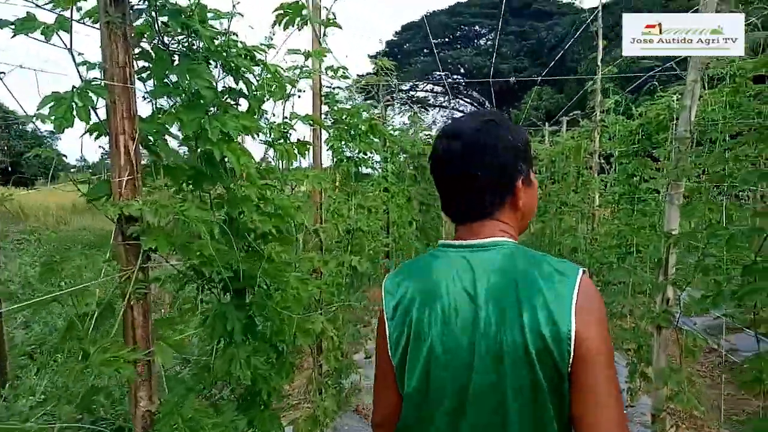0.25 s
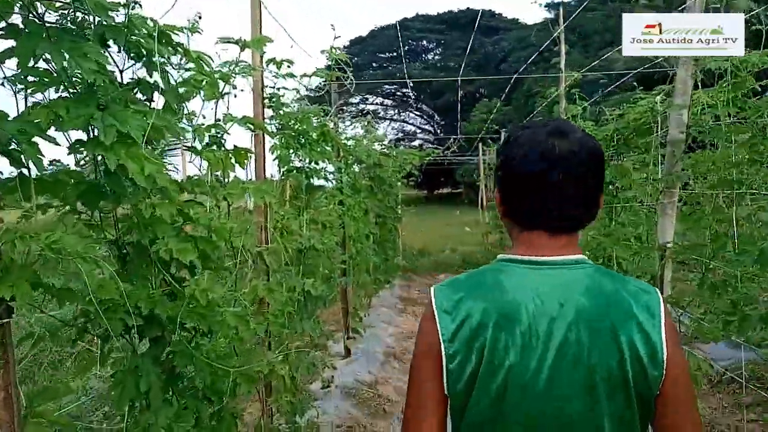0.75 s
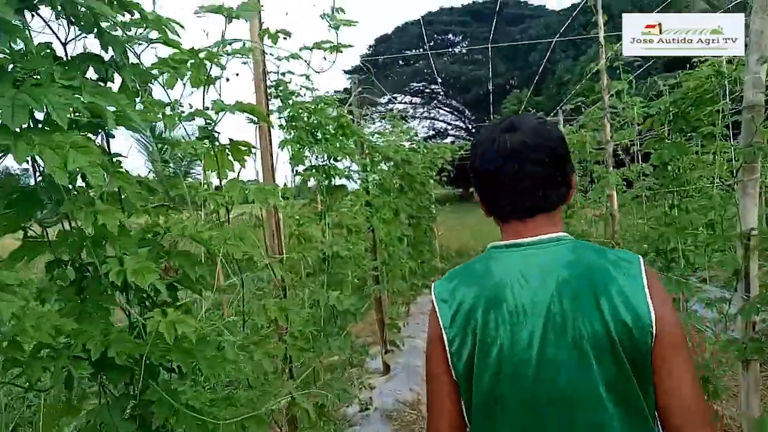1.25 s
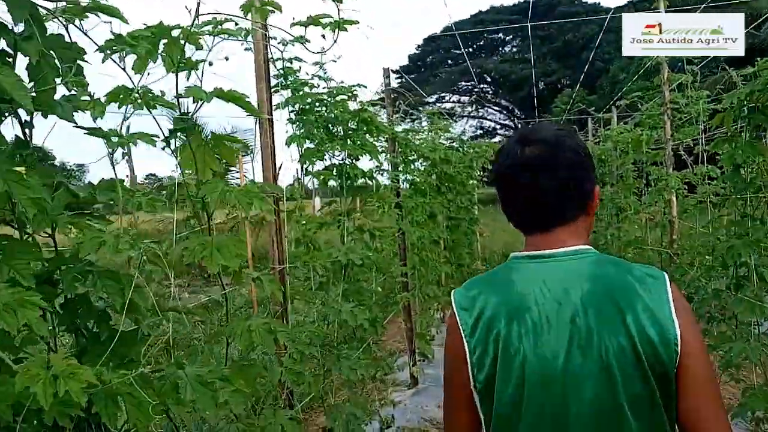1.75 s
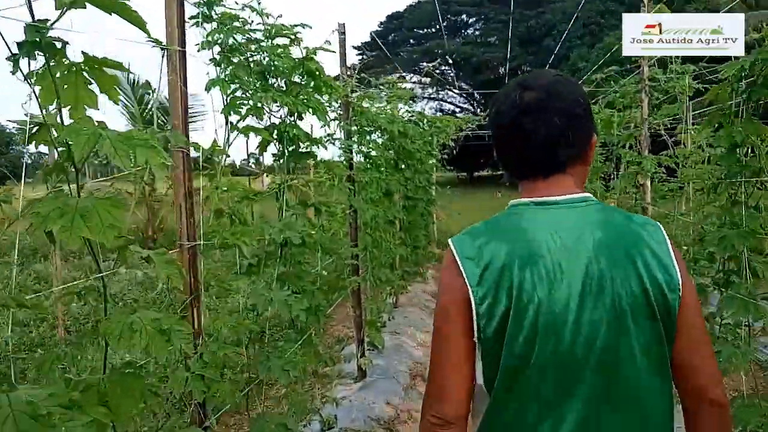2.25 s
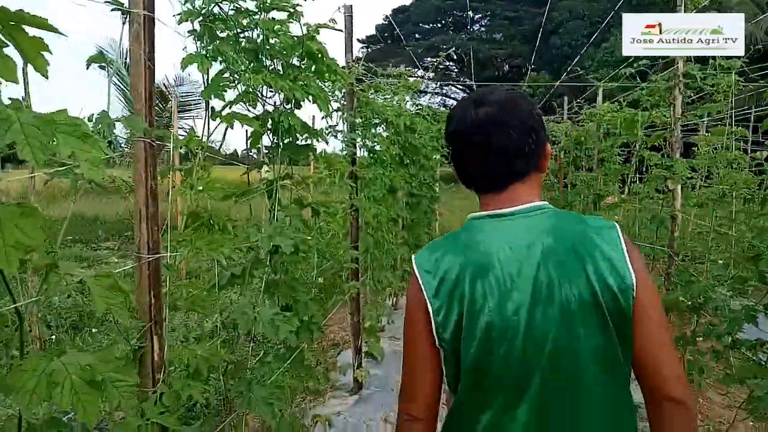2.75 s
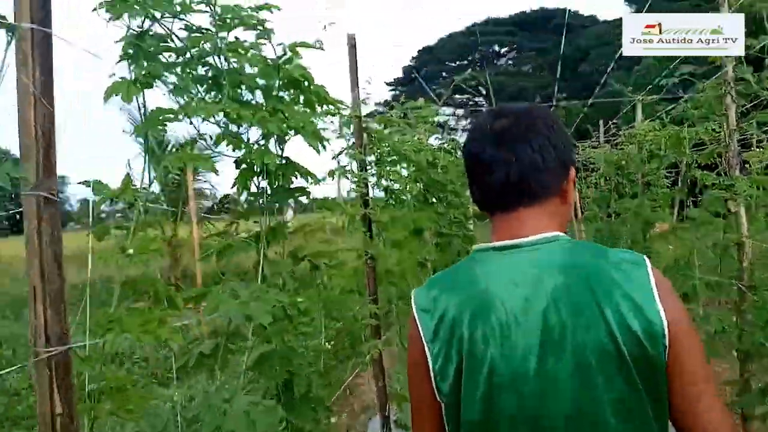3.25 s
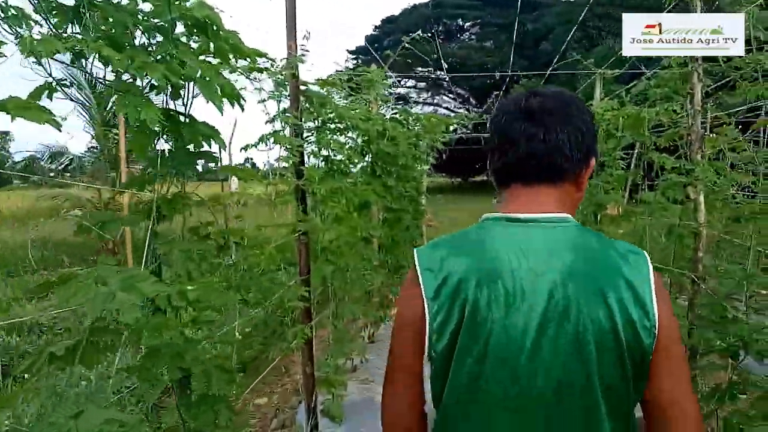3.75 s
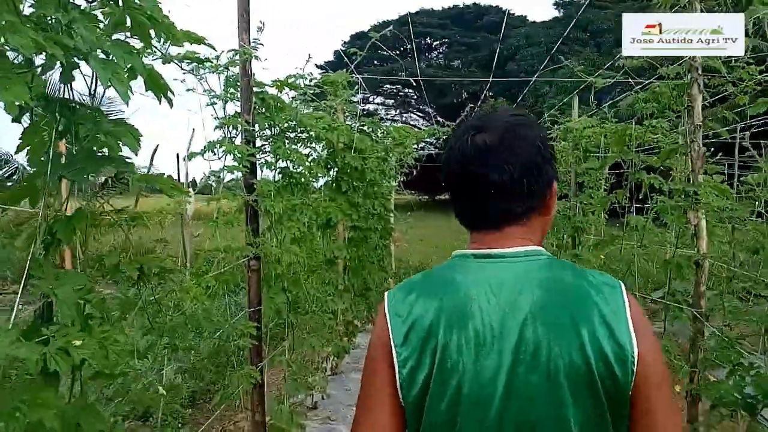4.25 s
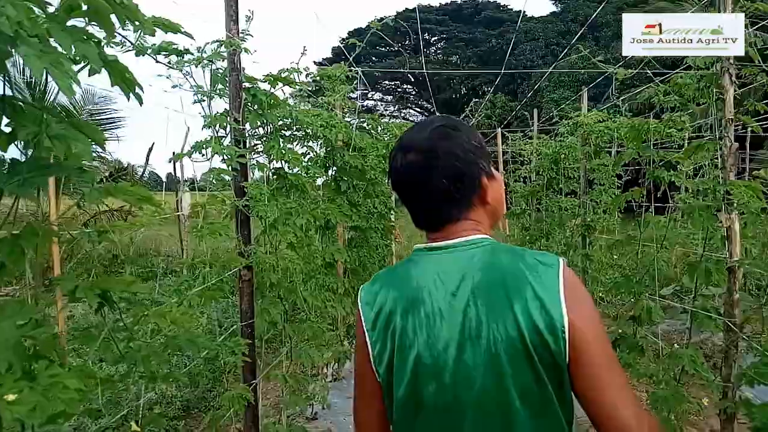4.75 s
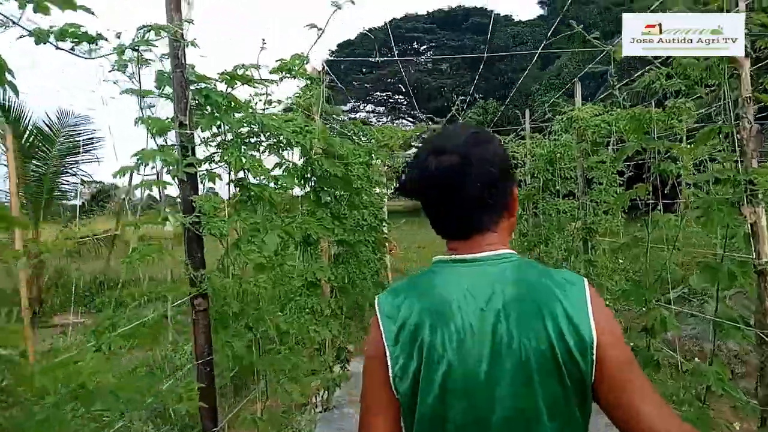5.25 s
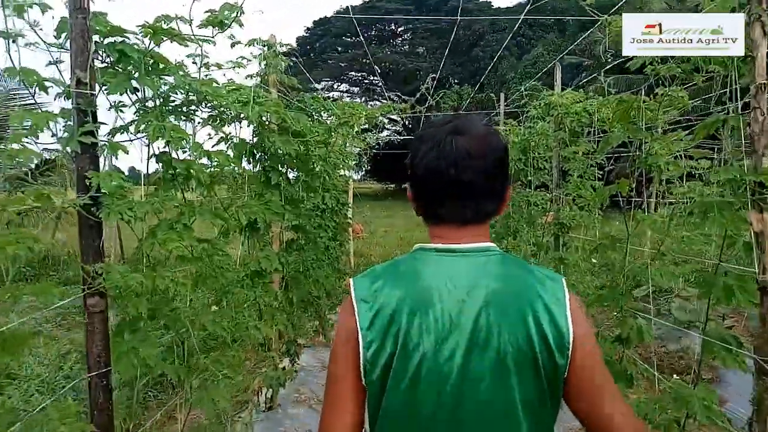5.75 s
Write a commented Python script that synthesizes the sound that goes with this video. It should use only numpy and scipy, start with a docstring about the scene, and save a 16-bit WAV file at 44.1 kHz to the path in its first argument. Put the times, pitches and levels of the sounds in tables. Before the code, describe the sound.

A goat bleats twice in wavering cries while someone brushes through leafy vines, with distant roosters, insects and a low engine rumble.

```python
"""Goat among the trellises

A goat bleats twice, in wavering swells: vocal-fold harmonics pass through throat resonances, with rasp.
Someone walks between vegetable trellises: shaped noise for brushing leaves and dry stalks underfoot.
Roosters crow far off and small birds call, as gliding tones smeared by scattering.
Insects shrill as noise through narrow resonances; a distant engine rumbles as low noise and tones."""
import sys
import numpy as np
from scipy import signal
from scipy.fft import rfft, irfft, next_fast_len
from scipy.io import wavfile

SR = 44100
rng = np.random.default_rng(int(sys.argv[2]) if len(sys.argv) > 2 else 0)


def dump_mix(stems):
    """Bounce the given channels to the path in sys.argv[1] as a 16-bit WAV at rate SR."""
    frames = np.atleast_2d(stems).T  # one column per channel
    limited = np.clip(frames, -1, 1)  # hard clip at full scale
    pcm = np.round(limited * 32767).astype(np.int16)
    wavfile.write(sys.argv[1], SR, pcm)


N = 264159
T = np.arange(N) / SR   # time in s


# throat resonances in each bleat: f/Hz, relative level/dB
FIRST_THROAT = [(480, -2), (960, 3.5), (1440, 1), (1920, -3.5), (2400, -16.5), (2880, -23), (3370, -3),
                (3850, -12), (4330, -5), (4850, -7.5), (5300, -6), (5780, -21), (6550, -3), (8200, -55)]
SECOND_THROAT = [(360, 4), (470, -5), (750, -17), (930, 14), (1380, -4.5), (1850, -14), (2320, -21.5),
                 (2790, 0), (3230, 4), (3720, -4), (4200, 5.5), (4650, 1.5), (5200, -13), (7500, -36)]
# harmonics under the chest, mouth, nasal and upper resonances: first number, last number
VOICE_GROUPS = [(1, 2), (3, 5), (6, 8), (9, 17)]
# colour of the breathy rasp: f/Hz, relative density/dB per Hz
RASP = [(300, -11), (600, 1.5), (1400, -9), (2400, -9), (3300, -4), (5000, -1.5), (7000, -1), (12000, -15)]
# the folds lose their grip as a bleat starts or ends: t/s, half length/s, extra jitter (share of the pitch)
BREAKS = [(0.258, 0.016, .045), (1.828, 0.023, 0.06), (2.388, 0.029, 0)]
# jaw and tongue move two resonances: t/s, mouth f/Hz, nasal f/Hz
TONGUE = [(0, 1670, 3520), (.1, 1510, 3380), (.19, 1730, 3350), (.26, 1450, 3300), (1.9, 1600, 3140),
          (1.99, 1910, 3207), (2.06, 1330, 3230), (2.13, 1600, 3050), (2.2, 1450, 3020),
          (2.255, 1335, 2540), (2.31, 1740, 2970), (2.38, 1303, 2670)]
TONGUE_LIFT_DB, TONGUE_WIDTH_HZ = 6, 310
THROAT_SMEAR = .45   # the ringing throat spreads each puff over its cycle: rad per squared harmonic number


def bleat(pitch, levels, gate, throat, jitter, flutter_db, rasp_db, rasp_throb):
    """Source and filter: fold harmonics weighted by the throat, with rasp puffed out once a cycle."""
    on = gate > 0
    unsteady = jitter + sum(extra * swell(s, half) for s, half, extra in BREAKS)
    phase = turning(pitch * (1 + unsteady * drift(116)))
    centres = [hz[on] for hz in in_time(TONGUE)]
    voice = np.zeros(N)
    for (first, last), level_db in zip(VOICE_GROUPS, levels):
        orders = np.arange(first, last + 1)[:, None]
        hz = orders * pitch[on]
        nearness = sum(np.exp(-((hz - centre) / TONGUE_WIDTH_HZ) ** 2) for centre in centres)
        flutter = np.array([drift(29)[on] for _ in orders])
        gains = from_db(at_hz(throat, hz) + TONGUE_LIFT_DB * nearness + flutter_db * flutter)
        # the harmonics under one resonance share its power
        gains = gains / np.sqrt((gains ** 2).sum(axis=0) / 2)
        harmonics = gains * np.sin(orders * phase[on] - THROAT_SMEAR * orders ** 2)
        voice[on] += from_db(level_db[on]) * harmonics.sum(axis=0)
    effort = sum(from_db(level_db) for level_db in levels) / 2
    puffs = 1 + np.clip(rasp_throb, 0, 1) * np.cos(phase)
    rasp = from_db(rasp_db) * effort * noise(RASP) * puffs
    return gate * (voice + rasp)


# quavers, in which the mouth opens and the pitch sags:
# t/s, half length/s, chest level/dB, mouth level/dB, sag f/Hz
QUAVERS = [(0.002, 0.025, -54, -34.5, 1), (.087, .013, -46, -19.5, 9), (0.185, .014, -40.5, -26.5, 8.5),
           (0.245, .012, -63, -42, 1), (1.909, .015, -62, -40, 19), (1.975, .011, -39, -24, 21),
           (2.06, .019, -37.5, -23, 23), (2.15, .022, -33, -31.5, 0), (2.197, 0.0145, -35.5, -31.5, 8.5),
           (2.26, 0.026, -28.5, -37.5, 1.5), (2.316, .023, -45, -23, 3), (2.362, 0.0087, -46, -27.5, 0.5),
           (2.377, 0.0057, -31, -31, 12)]
SAG_LINGERS = 1.2   # the sag outlasts its quaver by this factor
FALL_SHARE, FALL_S = 0.27, .028   # the pitch collapses as a bleat runs out
GRUFF_S, GRUFF_DROP = .065, .235   # lower register at the start: length, share of the pitch


def bleat_pitch(start, end, held_hz):
    """Fold tension sets pitch: it cracks up from a gruff start, sags in quavers and collapses at the end."""
    sag = sum(sag_hz * swell(s, half * SAG_LINGERS) for s, half, _, _, sag_hz in QUAVERS)
    fall = FALL_SHARE * np.exp(np.minimum(T - end, 0) / FALL_S)
    register = 1 - GRUFF_DROP * (T < start + GRUFF_S)
    return (held_hz - sag) * (1 - fall) * register


CLOSED_CHEST_DB, CLOSED_MOUTH_DB = -55, -52   # between quavers


def bleat_levels(nasal, buzz, nasal_db, buzz_db):
    """Modulation by the mouth: of the chest, mouth, nasal and upper levels, quavers swell the lower two."""
    chest, mouth = sum(from_db(levels_db)[:, None] * swell(s, half) for s, half, *levels_db, _ in QUAVERS)
    chest_db = 20 * np.log10(chest + from_db(CLOSED_CHEST_DB))
    mouth_db = 20 * np.log10(mouth + from_db(CLOSED_MOUTH_DB))
    return [chest_db, mouth_db, in_time(nasal)[0] + nasal_db, in_time(buzz)[0] + buzz_db]


# nasal ring and upper buzz, one curve per bleat: t/s, level/dB before the bleat's offset
NASAL = [
    [(0.0, -29), (0.03, -32), (0.1, -22.5), (0.12, -37), (0.14, -39.5), (0.202, -30), (0.262, -56)],
    [(1.8, -65), (1.866, -58), (1.894, -35), (2.07, -26.5), (2.176, -27.5), (2.19, -39), (2.292, -28),
     (2.368, -45), (2.395, -55)],
]
BUZZ = [
    [(0.0, -33), (0.042, -39), (0.086, -30.5), (0.112, -27.5), (0.138, -39), (0.18, -34.5), (0.252, -39.5),
     (0.262, -48)],
    [(1.8, -49), (1.884, -51), (2.068, -38), (2.102, -39.5), (2.182, -31), (2.214, -38.5), (2.274, -24.5),
     (2.374, -42), (2.395, -58)],
]


def goat():
    """Two source-filter bleats with their echoes; the first is already under way."""
    first = bleat(
        bleat_pitch(start=-.2, end=.277, held_hz=486.5),
        bleat_levels(NASAL[0], BUZZ[0], nasal_db=-0.5, buzz_db=-1.0),
        during(NASAL[0]), FIRST_THROAT, jitter=0.0087, flutter_db=5.5, rasp_db=-20.5, rasp_throb=1.0)
    second = bleat(
        bleat_pitch(start=1.8, end=2.394, held_hz=470.4),
        bleat_levels(NASAL[1], BUZZ[1], nasal_db=0, buzz_db=-1.0),
        during(NASAL[1]), SECOND_THROAT, jitter=0.0052, flutter_db=4.0, rasp_db=-15.5, rasp_throb=1.0)
    return outdoors(first + second, dull_hz=3000)


# echoes from the ground and the tree line: delay t/s, level/dB
ECHOES = [(.021, -22), (.05, -20), (0.092, -34), (.14, -40)]


def outdoors(x, dull_hz):
    """Diffuse reflection: each echo comes back dulled and smeared by leaves."""
    out = x.copy()
    for delay, db in ECHOES:
        smear = rng.standard_normal(int(.03 * SR)) * np.hanning(int(.03 * SR))
        back = signal.fftconvolve(x, smear / np.linalg.norm(smear))[:N]
        back = signal.sosfilt(signal.butter(1, dull_hz, fs=SR, output="sos"), back)
        out += from_db(db) * np.interp(T - delay, T, back, left=0)
    return out


# footfalls on dry stalks: t/s, half length/s before shaping, thud level/dB, crunch level/dB
STEPS = [(.926, 0.0075, -69, -43.5), (1.089, 0.0046, -40, -39), (1.11, .009, -44, -45),
         (1.156, .012, -44.5, -39), (1.194, 0.0013, -53, -41), (1.21, 0.031, -66, -45.5),
         (1.538, 0.01, -52, -47), (2.164, .0035, -34, -35), (2.922, 0.013, -44, -36.5),
         (2.972, 0.0078, -44, -29.5), (3.006, 0.017, -55, -46), (3.559, 0.015, -55, -47),
         (3.733, 0.04, -52, -40), (5.003, 0.011, -63, -38.5), (5.048, 0.01, -65, -38),
         (5.621, 0.0031, -66, -38), (5.677, .02, -46, -28), (5.926, 0.0054, -65, -47)]
# leaves and tendrils flicking past: t/s, half length/s before shaping, crackle level/dB
FLICKS = [(0.462, .015, -33.5), (1.356, 0.0042, -35), (1.404, .005, -40), (1.44, 0.0057, -28.5),
          (1.46, .004, -28), (1.569, 0.01, -30.5), (2.597, 0.0033, -38), (3.679, .011, -28.5),
          (5.497, .0047, -32.5), (5.524, 0.017, -31)]
# vines brushing past: peak t/s, rise/s, decay/s, level/dB before the brush gain
BRUSHES = [(.1, .04, 0.42, -46), (.445, 0.017, 0.5, -39.5), (1.38, 0.082, 0.54, -46.5),
           (2.04, 0.11, 0.14, -34), (2.28, 0.036, 0.071, -33.5), (3.2, .02, 0.26, -50),
           (3.75, 0.11, 0.22, -39), (5.02, .025, 0.21, -49), (5.5, 0.08, 0.22, -38),
           (5.86, 0.023, 0.23, -48)]
# noise colours of treading, stalks, fibres and leaves: f/Hz, relative density/dB per Hz
THUD = [(150, -34), (420, -3), (620, 2), (1050, 7.5), (1500, -9), (3000, -9)]
CRUNCH = [(200, 2.5), (450, -24.5), (750, -17), (1200, -2.5), (2100, 3.5), (2700, -4.5), (3300, -0.5),
          (4500, -7), (6500, -4), (10000, -15)]
CRACKLE = [(2000, -50), (4000, -2), (6000, 6), (9000, 7), (13000, -2), (15500, 12.5)]
LEAVES = [(300, -9.5), (1200, -12), (2500, -7.5), (5000, -10), (7000, -3), (9500, -8), (13000, -2),
          (14300, -6), (15500, 5.5)]
STEP_CRACKLE_DB = -9   # relative to the crunch
FLICK_THUD_DB, FLICK_CRUNCH_DB = -20.5, -14.5   # relative to the crackle


def walking(brush_db, leaf_grain_db, step_grain_db, attack, release):
    """Friction and fracture: leaves hiss sliding by; clumps of fibres break fast, then trail off."""
    sliding = 0
    for s, rise, decay, db in BRUSHES:
        shape = np.where(T < s, swell(s, rise), np.exp(-np.abs(T - s) / decay))
        sliding = sliding + from_db(db + brush_db) * shape
    brush = sliding * rms_one(noise(LEAVES) * from_db(leaf_grain_db * drift(320)))

    def breaking(rows):
        """Superposed bursts, one envelope for each level column."""
        return sum(from_db(levels_db)[:, None] * swell(s, half * np.where(T < s, attack, release))
                   for s, half, *levels_db in rows)

    tread, step = breaking(STEPS)
    flick, = breaking(FLICKS)
    thud = (tread + from_db(FLICK_THUD_DB) * flick) * noise(THUD)
    crunch = (step + from_db(FLICK_CRUNCH_DB) * flick) * noise(CRUNCH)
    crackle = (from_db(STEP_CRACKLE_DB) * step + flick) * noise(CRACKLE)
    grain = rms_one(from_db(step_grain_db * drift(490)))
    return brush + grain * (thud + crunch + crackle)


# held notes of far roosters: t/s, length/s, start f/Hz, middle f/Hz, end f/Hz, level/dB,
# fade/dB per s (negative grows), scattered share (capped at 1)
CROWS = [(0.391, 0.042, 1660, 1686, 1656, -58, 1, 0.84), (.55, .12, 1720, 1732, 1740, -54, 60, .9),
         (0.754, 0.55, 1800, 1806, 1787, -52.5, -5.5, 1.17),
         (1.61, 1.03, 1653, 1638, 1600, -49.5, 9.5, 0.16), (3.62, 0.094, 1920, 1920, 1930, -49, 10, 0.6),
         (3.813, 0.188, 1940, 1956, 1914, -38.5, 1, .3), (4.056, .16, 1938, 1925, 1910, -47.5, 20, .7),
         (4.384, .13, 1915, 1925, 1905, -52, 10, 0.86)]


def far_crows(rate):
    """Distance attenuation: only the strongest partial of a crow is left."""
    out = 0
    for s, length, start_hz, middle_hz, end_hz, level_db, fade, share in CROWS:
        hz = np.interp(T, [s, s + length / 2, s + length], [start_hz, middle_hz, end_hz])
        level = from_db(level_db - fade * np.clip(T - s, 0, length))
        out = out + level * held(s, length) * scattered(turning(hz), share, rate)
    return out


# syllables of the hoarse rooster: t/s, length/s, start f/Hz, end f/Hz,
# fundamental level/dB, throat level/dB, both before the voice's trims
SYLLABLES = [(3.387, 0.033, 714, 724, -46.5, -47), (3.623, 0.11, 840, 870, -51, -46),
             (3.85, 0.11, 815, 816, -43, -44.5), (3.978, .21, 810, 784, -42.5, -44.5),
             (4.457, 0.178, 830, 812, -52.5, -45.5), (4.661, 0.25, 794.5, 752, -58, -46.5),
             (4.972, 0.036, 668, 664, -45, -50)]
# colour of its rasp: f/Hz, relative density/dB per Hz
HOARSE_RASP = [(500, -25), (800, 2), (1000, -16), (1250, 1.5), (1550, 2), (1950, -0.5), (2300, -19),
               (3000, -12.5), (4000, -28)]


def hoarse_crow(low_db, high_db, rasp_db, throb_db):
    """Irregular vibration: two smeared harmonics in a throbbing rasp, the upper one rougher."""
    out, rasp = 0, from_db(rasp_db) * noise(HOARSE_RASP)
    for s, length, start_hz, end_hz, low, high in SYLLABLES:
        phase = turning(np.interp(T, [s, s + length], [start_hz, end_hz]))
        fundamental = from_db(low + low_db) * scattered(phase, share=1.0, rate=23.0)
        second = scattered(2 * phase, share=.8, rate=45)
        # the upper harmonic is weaker still where the throat level is below the fundamental
        second = second * min(from_db(high - low), 1)
        throat = from_db(high_db) * second + rasp
        throb = from_db(high + throb_db * drift(16))
        out = out + held(s, length) * (fundamental + throb * throat)
    return out


CROW_ATTACK_S, CROW_RELEASE_DB_PER_S = 0.04, 117


def held(s, length):
    """Exponential decay: a rooster's note attacks quickly, holds, then lingers over the field."""
    attack = np.clip(1 + (T - s) / CROW_ATTACK_S, 0, 1)
    return attack * from_db(-CROW_RELEASE_DB_PER_S * np.clip(T - s - length, 0, 1))


# short calls of birds and far fowl: t/s, length/s, start f/Hz, end f/Hz, level/dB, blur f/Hz
CHIRPS = [(0.908, 0.042, 2250, 2310, -44.5, 110), (1.292, 0.078, 6500, 5400, -47.5, 90),
          (1.31, 0.031, 2650, 2800, -52, 80), (2.675, 0.039, 440, 496, -51.5, 13),
          (3.014, 0.21, 1930, 2190, -58.5, 130), (3.357, 0.14, 1980, 1874, -46.5, 150),
          (3.383, 0.17, 1580, 1423, -46.5, 83), (3.59, .07, 2880, 2950, -48, 29),
          (3.614, 0.21, 1724, 1748, -44.5, 26), (3.805, 0.069, 6780, 5300, -39.5, 330),
          (3.83, 0.26, 2920, 2870, -53.5, 55), (4.006, 0.07, 4500, 4200, -49, 110),
          (4.302, .2, 1130, 1355, -54.5, 80), (5.068, 0.1, 1910, 1890, -48.5, 170),
          (5.736, 0.26, 2050, 2120, -48.5, 360)]


def bird():
    """Multipath scattering: short gliding calls, blurred by the foliage."""
    out = 0
    for s, length, start_hz, end_hz, level_db, blur_hz in CHIRPS:
        phase = turning(np.interp(T, [s, s + length], [start_hz, end_hz]))
        shape = swell(s + length / 2, length / 4)
        out = out + from_db(level_db) * shape * scattered(phase, share=0.95, rate=blur_hz)
    return out


# insect bands: f/Hz, width f/Hz, level/dB about which each flickers
INSECTS = [(3830, 1150, -55.5), (7802, 666, -43), (11076, 900, -46), (15000, 1200, -60)]
# one nearer insect swells: t/s, half length/s, level/dB
TRILLS = [(0.982, 0.12, -48), (1.483, 0.1, -44.5), (2.421, 0.058, -42), (3.257, 0.092, -39),
          (4.27, 0.082, -44.5), (5.148, 0.078, -40.5)]


def insects(trill_hz, trill_width_hz, undertone_db, flicker_db):
    """Resonance: a flickering chorus, and one insect that swells with a faint band an octave below."""
    chorus = sum(from_db(db + flicker_db * drift(45)) * shrill(hz, width) for hz, width, db in INSECTS)
    undertone = from_db(undertone_db) * shrill(trill_hz / 2, trill_width_hz)
    song = shrill(trill_hz, trill_width_hz) + undertone
    return chorus + song * sum(from_db(db) * swell(s, half) for s, half, db in TRILLS)


# colour of the engine's roar: f/Hz, relative density/dB per Hz
RUMBLE = [(13, -51), (22, -23), (32, -29), (34, -32), (40, -24), (50, -11.5), (81, -1.5), (129, 0.5),
          (146, -2.5), (162, -3.5), (194, -11), (230, -23.5), (249, -30.5), (330, -38.5), (430, -43),
          (730, -120)]
# brief low thumps in the rumble band: t/s, half length/s, level/dB
THUMPS = [(3.337, 0.032, -40), (3.73, 0.089, -46), (4.845, 0.026, -42), (5.924, .012, -30)]
# engine tones: f/Hz, level/dB before the common tone gain
ENGINE = [(65, -46), (93, -47), (142, -41.5)]
# upper drone under load: t/s, level/dB
ENGINE_LOAD = [(0, -68), (3.9, -66), (4.3, -47), (4.8, -44), (4.9, -44), (4.98, -74)]
RUMBLE_DB, RUMBLE_WANDER_DB = -34.5, 1.05


def rumble(tones_db, drone_hz, drone_width_hz):
    """Periodic and random radiation: a far engine's wandering tones, dull roar and drone under load."""
    thumps = sum(from_db(db) * swell(s, half) for s, half, db in THUMPS)
    roar = (thumps + from_db(RUMBLE_DB + RUMBLE_WANDER_DB * drift(5.7))) * noise(RUMBLE)
    tones = sum(from_db(db) * scattered(2 * np.pi * hz * T, share=0.39, rate=4.6) for hz, db in ENGINE)
    drone = from_db(in_time(ENGINE_LOAD)[0]) * shrill(drone_hz, drone_width_hz)
    return roar + from_db(tones_db) * tones + drone


# colour of the open air: f/Hz, relative density/dB per Hz
AIR = [(250, -1), (400, 3), (800, 1.5), (1700, 3), (2500, -1.5), (5500, -18), (15000, -5.5)]


def air(level_db):
    """Stationary noise: a faint steady hush."""
    return from_db(level_db) * noise(AIR)


def from_db(db):
    """Logarithmic level: decibels to amplitude gain."""
    return 10 ** (np.asarray(db) / 20)


def rms_one(x):
    """Root mean square: scale to unit level."""
    return x / np.sqrt(np.mean(np.abs(x) ** 2) + 1e-20)


def in_time(rows):
    """Linear interpolation: each column of a curve, sample by sample."""
    s, *columns = np.transpose(rows)
    return [np.interp(T, s, c) for c in columns]


def during(rows, fade=0.016):
    """Gating: one while a curve lasts, fading to zero outside it."""
    return np.clip(1 + np.minimum(T - rows[0][0], rows[-1][0] - T) / fade, 0, 1)


def at_hz(points, hz):
    """Logarithmic frequency: read a spectrum in dB between its points."""
    f, db = np.transpose(points)
    return np.interp(np.log(hz), np.log(f), db)


def noise(spectrum):
    """Spectral shaping: noise of a given colour at unit level."""
    size = next_fast_len(N, True)
    hz = np.fft.rfftfreq(size, 1 / SR) + 1e-3
    white = rfft(rng.standard_normal(size))
    return rms_one(irfft(white * from_db(at_hz(spectrum, hz)))[:N])


def drift(rate):
    """Low-passed chance: a random wander of unit spread, with rate in Hz."""
    r = np.exp(-40 * np.pi * rate / SR)   # computed at every 20th sample
    white = rng.standard_normal(N // 20 + 4002)
    slow = signal.lfilter([1], [1, -2 * r, r * r], white)[4000:]   # the filter has settled
    return np.interp(np.arange(N) / 20, np.arange(len(slow)), rms_one(slow))


def turning(hz):
    """Phase as the integral of frequency: a moving pitch to radians."""
    return 2 * np.pi * np.cumsum(hz) / SR


def scattered(phase, share, rate):
    """Multipath fading: a tone of which a share arrives over many shifting paths."""
    share = np.clip(share, 0, 1)
    smear = drift(rate) * np.cos(phase) + drift(rate) * np.sin(phase)
    return np.sqrt(2 * (1 - share)) * np.sin(phase) + np.sqrt(share) * smear


def shrill(hz, width_hz):
    """Cascaded resonance: noise twice through one resonator, at unit level."""
    r = np.exp(-np.pi * width_hz / SR)
    section = [1, 0, -1, 1, -2 * r * np.cos(2 * np.pi * hz / SR), r * r]
    return rms_one(signal.sosfilt([section, section], rng.standard_normal(N)))


def swell(s, half):
    """Gaussian envelope: a bell-shaped rise and fall."""
    return np.exp(-.5 * np.minimum(((T - s) / half) ** 2, 10 ** 2))


def scene():
    """Superposition: goat, walker, roosters and field add linearly."""
    walker = walking(brush_db=6.5, leaf_grain_db=3.5, step_grain_db=2.5, attack=0.79, release=1.52)
    roosters = far_crows(rate=32) + hoarse_crow(low_db=-1.5, high_db=1.0, rasp_db=-4.5, throb_db=-1.0)
    field = bird() + insects(trill_hz=7520, trill_width_hz=430, undertone_db=-13.5, flicker_db=1.06)
    field = field + rumble(tones_db=-1.5, drone_hz=218, drone_width_hz=23.7) + air(level_db=-56.0)
    return (goat() + walker + roosters + field)[None]


CUTOFF_HZ = 15750


def record(dry):
    """Band limiting: an elliptic low-pass cuts the top steeply."""
    return signal.sosfilt(signal.ellip(12, .1, 90, CUTOFF_HZ, fs=SR, output="sos"), dry)


dry = scene()
out = record(dry)
dump_mix(out)
```